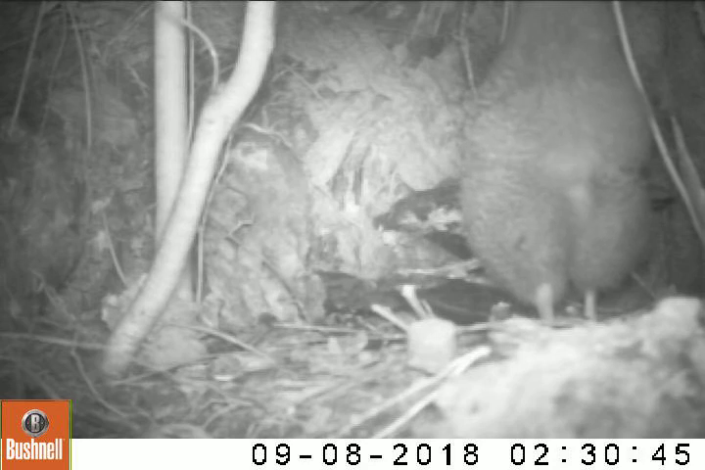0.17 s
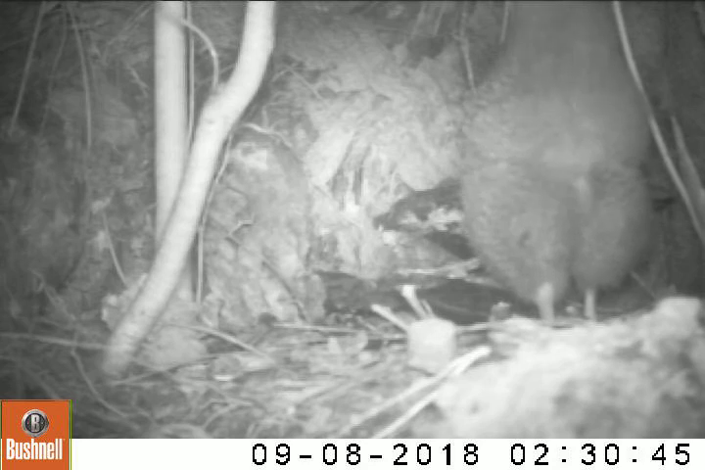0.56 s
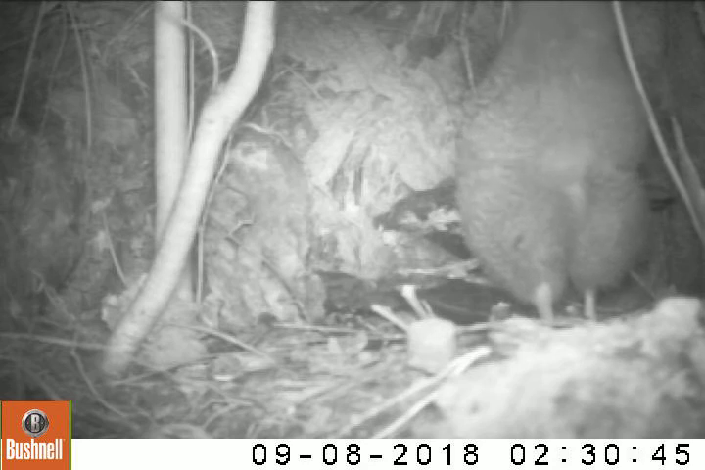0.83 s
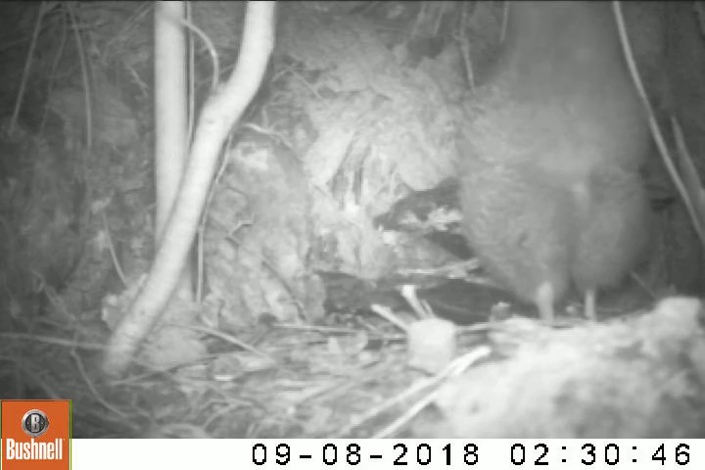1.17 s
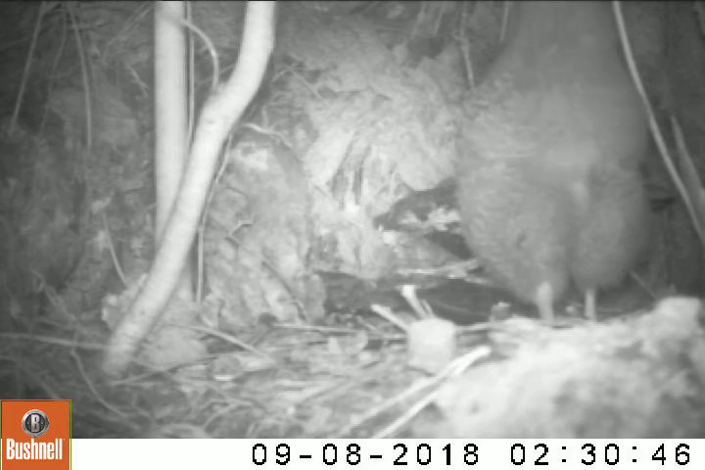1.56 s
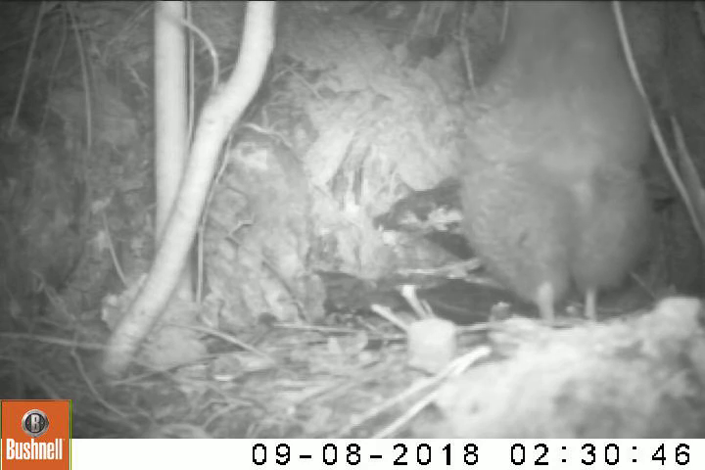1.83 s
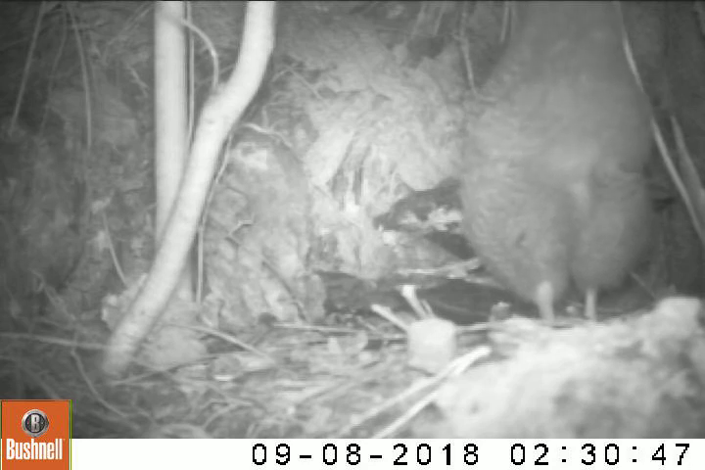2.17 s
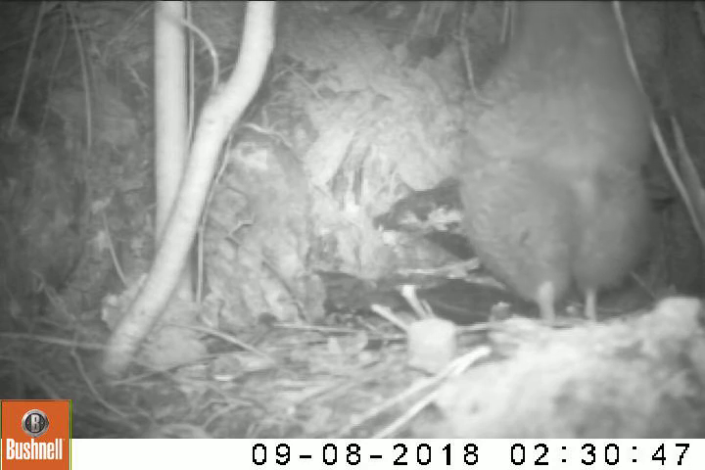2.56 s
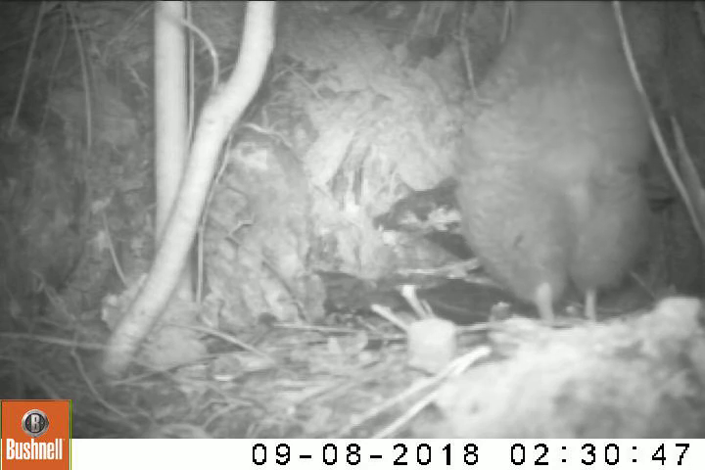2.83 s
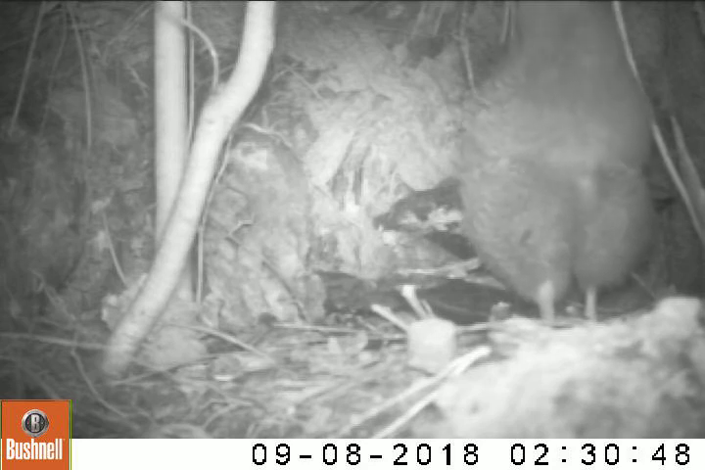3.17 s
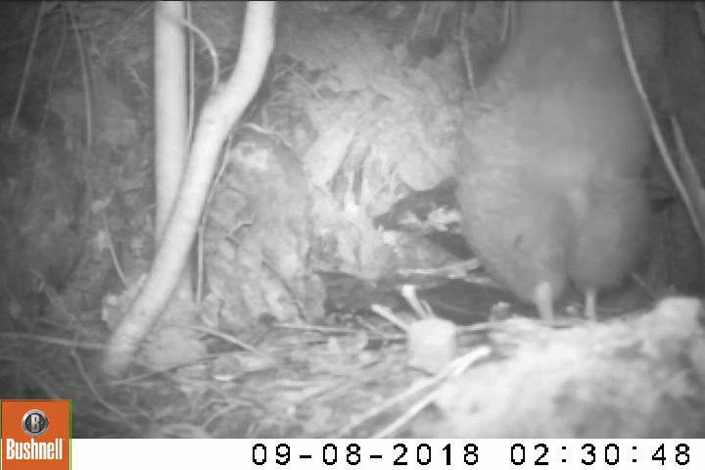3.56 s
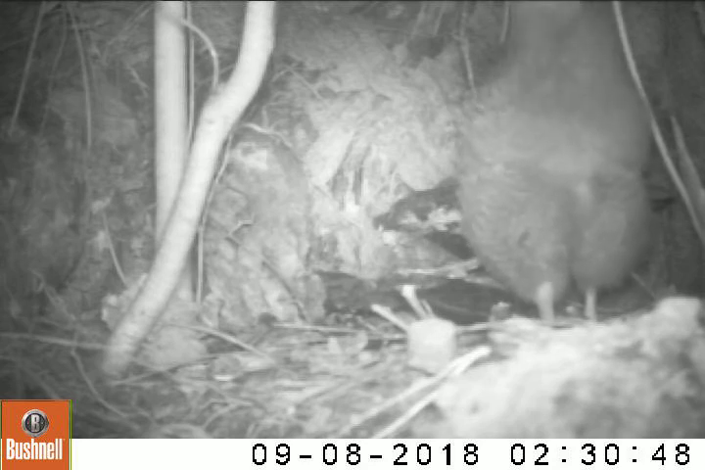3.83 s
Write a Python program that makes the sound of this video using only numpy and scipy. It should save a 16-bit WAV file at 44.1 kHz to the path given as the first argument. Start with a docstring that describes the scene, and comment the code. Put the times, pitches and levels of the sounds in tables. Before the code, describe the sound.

A kiwi calls six times, close by in a night forest; each short croak climbs into a shrill, raspy, warbling whistle and breaks into hiss. Faint echo, low rumble and trail camera hum lie beneath.

```python
"""First the faint forest echo of a kiwi call just ended; then the bird calls again and again, close by, at night.
Each call opens with a short croak of uneven pulses, climbs as a shrill, raspy whistle in six warbles
(swept harmonics through throat resonances, plus rushing air) and breaks up into a hiss and a low puff of noise.
A nearby bank and the trees throw it back as reflections, scatter and a faint long echo.
Beneath lie a low rumble and faint hiss of shaped noise, and a trail camera's wavering hum and thin whine."""
import sys
import numpy as np
from scipy import signal
from scipy.fft import rfft, irfft
from scipy.io import wavfile

SR = 44100
rng = np.random.default_rng(int(sys.argv[2]) if len(sys.argv) > 2 else 0)


def bounce(signal):
    """Save signal as a 16-bit WAV file at the path given by the first command-line argument."""
    frames = np.transpose(np.atleast_2d(signal))
    limited = np.clip(frames, -1, 1)
    pcm = np.round(limited * 32767).astype(np.int16)
    wavfile.write(sys.argv[1], SR, pcm)


N = 176400  # samples, 4 s
LEAD_S = 1  # time rendered ahead of zero, so that the first call can leave its echo

# Kiwi calls, one per row; the first ends before time zero and leaves only its echo.
# Columns: croak t/s, whistle t/s, first crest t/s, fifth crest t/s, last crest t/s, break-up t/s,
# mean pitch at the first, fourth and last crest f/Hz (three columns),
# level/dB of whistle and break-up, hoarseness level/dB
CALLS = [ (-.36, -.335, -.295, -.125, -.09, -.075, 1330, 1510, 1620, -2, 0),
         (.251, .272, .285, .454, .508, .521, 1330, 1495, 1740, -3, 3),
         (.828, .849, .860, 1.029, 1.078, 1.090, 1305, 1505, 1560, -2, 1),
         (1.488, 1.509, 1.555, 1.723, 1.759, 1.766, 1375, 1550, 1770, 0, 0),
         (2.159, 2.183, 2.227, 2.396, 2.433, 2.444, 1345, 1555, 1815, 0, 0),
         (2.881, 2.900, 2.938, 3.108, 3.146, 3.158, 1350, 1535, 1850, 0, -.5),
         (3.577, 3.603, 3.648, 3.817, 3.855, 3.867, 1340, 1585, 1880, .5, .5)]


def kiwi():
    """Each call is a croak, a whistle and a break-up from one bird, on a time line that begins LEAD_S early."""
    out = np.zeros(N + LEAD_S * SR)
    for start, catch, first, fifth, last, stop, low, middle, high, db, hoarse_db in CALLS:
        t = start + np.arange(SR // 2) / SR
        voice = whistle(t, catch, (first, fifth, last), stop, (low, middle, high), hoarse_db)
        voice = voice + break_up(t, stop)
        add(out, start + LEAD_S, croak(t, start, catch) + amp(db) * voice)
    return out


# Moments where the voice cracks into noise. Columns: t/s, strength (0-1)
CRACKS = [(.321, .5), (.352, .6), (.392, .5), (.963, .6), (1.006, .8), (1.657, 1), (2.226, .3), (2.25, .6),
          (2.958, .5), (3.637, .6)]
CRACK_S, CRACK_DIP_DB, CRACK_RASP_DB, CRACK_ROUGH = .006, -10, 7, 12
# Air rushing through the voice with the bill open. Columns: f/Hz, relative level/dB per Hz
RASP_OPEN = [(150, -32), (430, -15), (750, -27), (1100, -16), (1800, 2), (2500, -11), (3300, -2), (4400, 3),
             (5000, -4), (6200, -20), (9000, -14), (11400, -5), (13500, -17), (16000, -19)]
# The same air while the bill is still half shut. Columns: f/Hz, relative level/dB per Hz
RASP_SHUT = [(150, -30), (430, -10), (750, -21), (1300, -3), (1950, -3), (2500, -14), (3200, -4), (4000, 5),
             (4600, -7), (5300, -26), (8000, -25), (10000, -10), (12000, -9), (13500, -20), (16000, -29)]
BILL_OPENS_S = .16
RASP_DB, RASP_PATCH_DB, RASP_FRAY_DB, RASP_RELEASE_DB_PER_S = -51, 3, 8.5, 1000
WHISTLE_DB, SWELL_DB, TROUGH_DB, FRAY_DB, SHIMMER_DB = -15.8, 1.5, -8, -9, .9
ATTACK_S, RELEASE_DB_PER_S = .006, 1200
WARBLE_HZ, WARBLE_PEAKING = 130, .12  # pitch swing; crests are narrower than troughs
WARBLE_ONSET = .7  # cycles to build up
LAST_HOLD = .7  # the warble lingers on its last crest (0-1)
TROUGH_AT, TROUGH_ORDER = .41, 5  # slack after each crest: share of a warble, narrowness
DRIFT, JITTER, JITTER_HZ = .008, .0035, 900  # rms shares of the pitch (jitter grows with roughness); speed
ROUGH_TROUGH, ROUGH_END, FRAY_S = 1.5, 16, .027  # the voice frays in the troughs and around the break-up


def whistle(t, start, crests, stop, pitches, hoarse_db):
    """A climbing, warbling tone sweeps its harmonics through the throat resonances, with air rushing along."""
    first, fifth, last = crests
    # Warbles counted from the first crest; the last one has its own pace
    even_turn = 4 * (t - first) / (fifth - first)
    last_turn = 4 + (t - fifth) / (last - fifth)
    turn = np.where(t < fifth, even_turn, last_turn)
    turn = turn - (turn > 4.5) * LAST_HOLD * np.sin(2 * np.pi * turn) / (2 * np.pi)

    low, middle, high = pitches
    climb = np.interp(turn, [-3, 0, 3, 5], [2 * low - middle, low, middle, high])
    swing = np.cos(2 * np.pi * turn) + WARBLE_PEAKING * np.cos(2 * 2 * np.pi * turn)
    warble = ramp(turn + 1.15, WARBLE_ONSET) * swing

    # The push slackens just after each crest, until the fifth
    slack = (np.cos(np.pi * (turn - TROUGH_AT)) ** 2) ** TROUGH_ORDER
    slack = slack * (1 - ramp(t - fifth + .04, .04))
    fray = ramp(t - stop + FRAY_S, 2 * FRAY_S)
    after = np.maximum(t - stop, 0)
    crack = sum(strength * np.exp(-((t - s) / CRACK_S) ** 2) for s, strength in CRACKS)
    rough = amp(hoarse_db) + ROUGH_TROUGH * slack + ROUGH_END * fray ** 2 + CRACK_ROUGH * crack

    hz = (climb + WARBLE_HZ * warble) * (1 + DRIFT * wander(t, 90))
    rough_hz = hz * (1 + JITTER * rough * wander(t, JITTER_HZ))
    phase = 2 * np.pi * np.cumsum(rough_hz) / SR
    swell_db = SWELL_DB * (ramp(t - start, fifth - start) - 1)
    effort_db = swell_db + TROUGH_DB * slack + FRAY_DB * fray + CRACK_DIP_DB * crack
    tone_db = WHISTLE_DB + effort_db + SHIMMER_DB * wander(t, 120) - RELEASE_DB_PER_S * after
    tone = np.sqrt(2) * harmonics(t, hz, phase, rough, t - start) * amp(tone_db)

    bill = ramp(t - start, BILL_OPENS_S)
    rasp = np.sqrt(1 - bill) * air(t, RASP_SHUT) + np.sqrt(bill) * air(t, RASP_OPEN)
    rasp_db = RASP_DB + hoarse_db + RASP_PATCH_DB * wander(t, 70)
    rasp_db = rasp_db + RASP_FRAY_DB * fray + CRACK_RASP_DB * crack - RASP_RELEASE_DB_PER_S * after
    rasp = rasp * (1 + .5 * np.cos(phase)) * amp(rasp_db)  # the air pulses with the tone
    return ramp(t - start, ATTACK_S) * (tone + rasp)


# Strength of each harmonic before the throat, fundamental first. One column: level/dB
HARMONICS_DB = [0, .8, 1.3, -3, 1, -1.5, 0, -2, -4, -6]
# Resonances of throat and bill. Columns: f/Hz, level/dB
THROAT = [(700, -40), (1100, -9), (1300, -7.5), (1410, -8.5), (1520, -2), (1620, 1.8), (1780, .5),
          (1880, 1.5), (2020, 1.5), (2400, -48), (2800, -33), (3020, -23), (3260, -17), (3420, -18),
          (3550, -25), (3680, -18), (3820, -25), (3960, -21), (4130, -27), (4440, -20), (4700, -28),
          (4880, -28), (5100, -32), (5500, -32), (6000, -50), (7000, -48), (7700, -41), (8400, -48),
          (9500, -45), (10300, -47), (11200, -37), (13500, -55), (16000, -57)]
OVERTONE_FLUTTER_DB, OVERTONE_FLUTTER_HZ = 3, 130  # each overtone flickers in level
OVERTONE_SMEAR, OVERTONE_SMEAR_HZ = .07, 450  # and in phase: radians per harmonic at roughness 1, speed
HIGH_OVERTONES_DB, HIGH_OVERTONES_S = -16, .05  # harmonics above the third start low and come in late


def harmonics(t, hz, phase, rough, age):
    """A clean fundamental and flickering, smeared overtones, each as loud as the throat lets it through."""
    tone = amp(HARMONICS_DB[0] + read(THROAT, hz)) * np.sin(phase)
    late_db = HIGH_OVERTONES_DB * (1 - ramp(age, HIGH_OVERTONES_S))
    for k, db in enumerate(HARMONICS_DB[1:], 2):
        flutter_db = OVERTONE_FLUTTER_DB * wander(t, OVERTONE_FLUTTER_HZ)
        level_db = db + read(THROAT, k * hz) + flutter_db + (k > 3) * late_db
        smear = OVERTONE_SMEAR * k * np.sqrt(rough) * wander(t, OVERTONE_SMEAR_HZ)
        tone = tone + amp(level_db) * np.sin(k * phase + smear)
    return tone


# Colour of the opening croak. Columns: f/Hz, relative level/dB per Hz
CROAK = [(150, -30), (430, -2), (650, -3), (780, -6), (900, -5), (1050, 0), (1300, 3), (1900, -11),
         (2600, -28), (3300, -14), (4100, -10), (4700, -32), (8000, -44), (11300, -26), (15000, -46)]
CROAK_HZ, CROAK_JITTER, CROAK_NOISE, CROAK_DB = 448, .11, .9, -45  # jitter: rms share; noise: rms to pulses


def croak(t, start, stop):
    """Low, uneven pulses mixed with noise before the whistle catches."""
    turns = np.cumsum(CROAK_HZ * (1 + CROAK_JITTER * wander(t, 300))) / SR
    pulses = unit(sum(np.cos(2 * np.pi * k * turns) for k in range(1, 30)))
    breath = CROAK_NOISE * air(t, [(100, 0), (16000, 0)])
    gate = ramp(t - start, .002) * (1 - ramp(t - stop, .008))
    return amp(CROAK_DB) * gate * colour(pulses + breath, CROAK)


# Colour of the closing hiss. Columns: f/Hz, relative level/dB per Hz
HISS = [(150, -35), (420, -25), (800, -24), (1100, -17), (1800, 0), (2350, -6), (3000, -21), (3600, -20),
        (4800, -20), (6500, -42), (16000, -52)]
HISS_DB, HISS_LAG_S, HISS_WIDTH_S = -37, .003, .016  # level before the call's own level
# Colour of the last low puff of air. Columns: f/Hz, relative level/dB per Hz
PUFF = [(120, -25), (380, 0), (900, -2), (1500, -4), (3000, -30), (16000, -50)]
PUFF_DB, PUFF_LAG_S, PUFF_WIDTH_S = -56, .024, .009  # level before the call's own level


def break_up(t, stop):
    """The tone collapses into two bursts of coloured noise: a hiss and a last low puff."""
    hiss_swell = np.exp(-((t - stop - HISS_LAG_S) / HISS_WIDTH_S) ** 2)
    puff_swell = np.exp(-((t - stop - PUFF_LAG_S) / PUFF_WIDTH_S) ** 2)
    hiss = amp(HISS_DB) * air(t, HISS) * hiss_swell
    puff = amp(PUFF_DB) * air(t, PUFF) * puff_swell
    return hiss + puff


# Near reflections from ground and bank. Columns: delay t/s, level/dB
REFLECTIONS = [(.006, -15), (.0108, -24)]
# Leaves and twigs scatter mostly treble. Columns: f/Hz, relative level/dB
SCATTER = [(200, -14), (1800, -17), (3200, -2), (5000, 0), (16000, 0)]
SCATTER_DB, SCATTER_T60_S = -8, .028
# Colour of the long echo from the trees. Columns: f/Hz, relative level/dB
FOREST = [(200, -6), (1500, 2), (2000, -1), (4000, 1), (8000, -8), (16000, -14)]
FOREST_DB, FOREST_T60_S = -47.5, .68


def forest(x):
    """Direct sound, near reflections, scatter from the undergrowth and a faint long echo from the trees."""
    t = np.arange(SR) / SR
    scatter = air(t, SCATTER) * ramp(t, .002) * np.exp(-np.log(1000) * t / SCATTER_T60_S)
    echo = air(t, FOREST) * ramp(t, .02) * np.exp(-np.log(1000) * t / FOREST_T60_S)
    response = amp(SCATTER_DB) * unit(scatter) + amp(FOREST_DB) * unit(echo)
    response /= np.sqrt(len(t))  # levels become total energy relative to the direct sound
    response[0] += 1
    for delay, db in REFLECTIONS:
        response[round(delay * SR)] += amp(db)
    return signal.fftconvolve(x, response)[LEAD_S * SR:][:N]


# Colour of the steady rumble and hiss. Columns: f/Hz, relative level/dB per Hz
FLOOR = [(10, -3), (40, 0), (100, -8), (170, -17), (400, -21), (1000, -26), (3300, -30), (5000, -36),
         (11000, -38), (16000, -41)]
FLOOR_DB = -63.3
# Hum and whine of the camera, before its band limit. Columns: f/Hz, rms level/dB
HUM = [(57, -72), (109, -79), (15625, -85)]


def background():
    """Low rumble and faint hiss of shaped noise, with phase-wavering sines for the camera's hum and whine."""
    t = np.arange(N) / SR
    hum = 0
    for hz, db in HUM:
        phase = 2 * np.pi * hz * t + .8 * wander(t, 4)
        hum = hum + amp(db) * np.sqrt(2) * np.sin(phase)
    return amp(FLOOR_DB) * air(t, FLOOR) + hum


def amp(db):
    """Decibels to gain."""
    return 10 ** (np.asarray(db) / 20)


def unit(x):
    """Scales to rms 1."""
    return x / np.sqrt(np.mean(x ** 2) + 1e-20)


def read(points, hz):
    """Reads a spectrum on a log-frequency axis."""
    f, value = np.transpose(points)
    return np.interp(np.log(abs(hz) + 1), np.log(f + 1), value)


def colour(x, spectrum):
    """Filters a sound by a spectrum, at rms 1."""
    gain = amp(read(spectrum, np.fft.rfftfreq(len(x), 1 / SR)))
    return unit(irfft(rfft(x) * gain, len(x)))


def wander(t, hz):
    """Random motion mostly slower than hz, rms 1."""
    f = np.fft.rfftfreq(len(t), 1 / SR)
    slow = rfft(rng.standard_normal(len(t))) * np.exp(-(f / hz) ** 2)
    return unit(irfft(slow, len(t)))


def air(t, spectrum):
    """Turbulent air as coloured noise, rms 1."""
    return colour(rng.standard_normal(len(t)), spectrum)


def ramp(t, length):
    """Rises from 0 to 1 over length."""
    return np.clip(t / length, 0, 1)


def add(mix, s, sound):
    """Mixes a sound in at time s."""
    part = mix[round(s * SR):][:len(sound)]
    part += sound[:len(part)]


def scene():
    """The bird in its forest over the steady background."""
    return (forest(kiwi()) + background())[None]


def record(dry):
    """The camera's band limit: a steep low-pass at 15850 Hz."""
    low_pass = signal.firwin(511, 15850, window=("kaiser", 9), fs=SR)
    return signal.oaconvolve(dry, low_pass[None], "same")


dry = scene()
out = record(dry)
bounce(out)
```